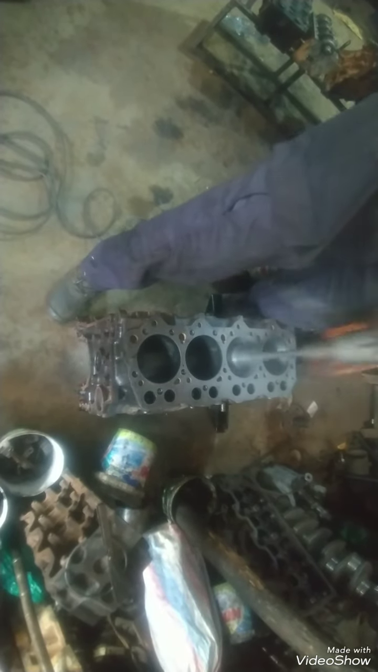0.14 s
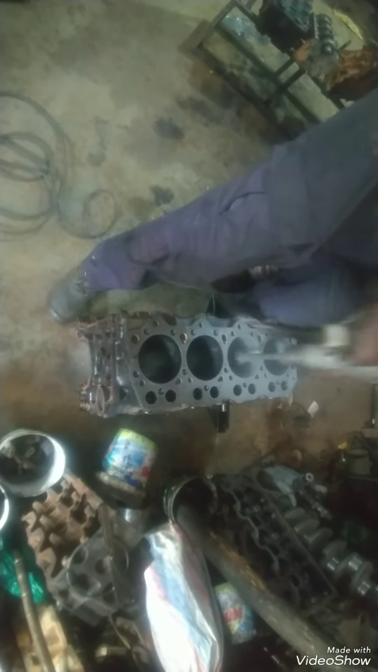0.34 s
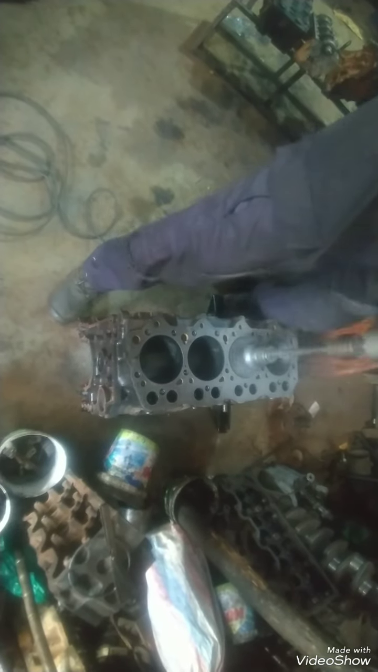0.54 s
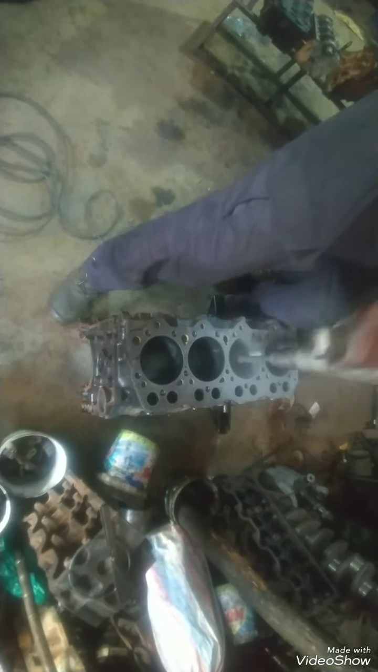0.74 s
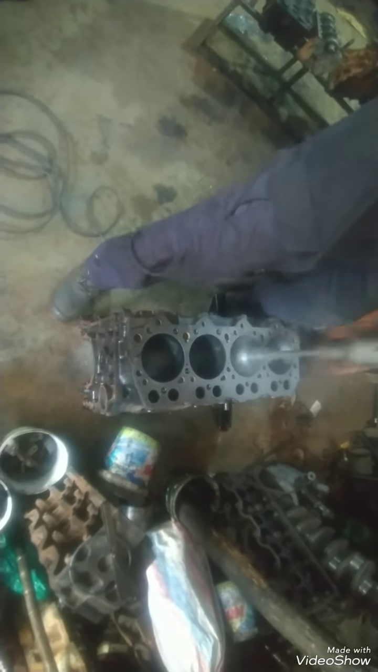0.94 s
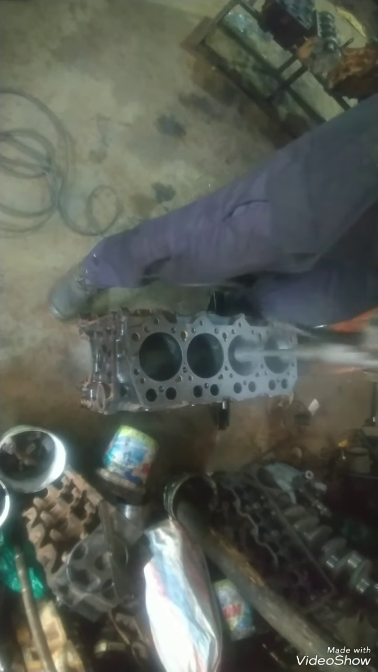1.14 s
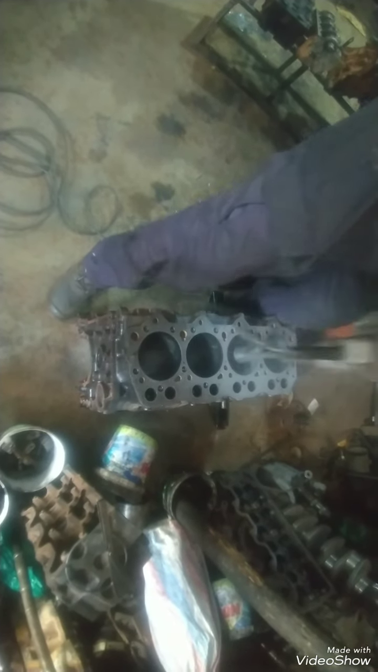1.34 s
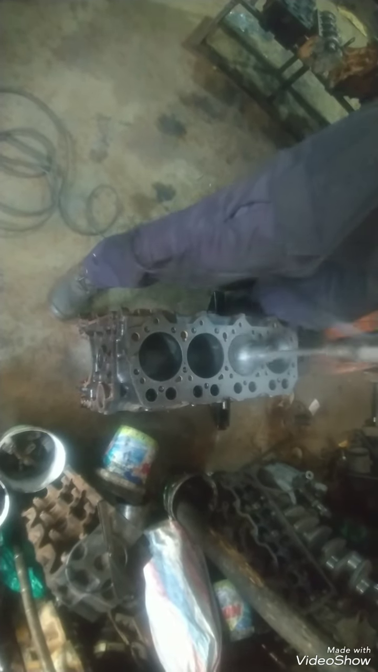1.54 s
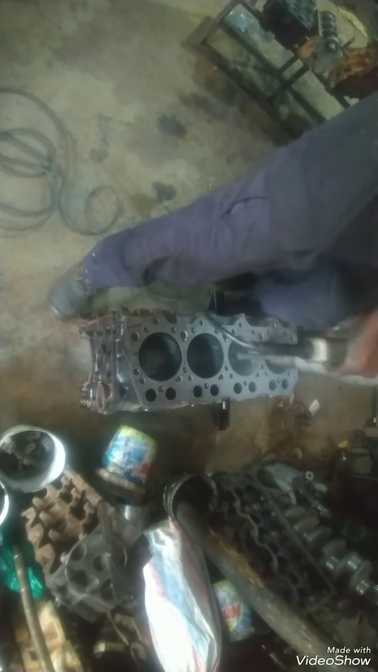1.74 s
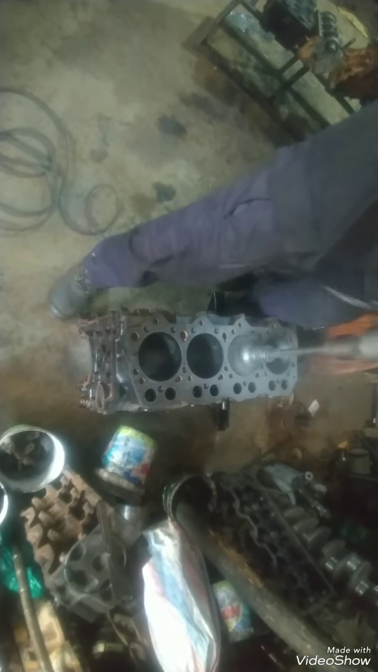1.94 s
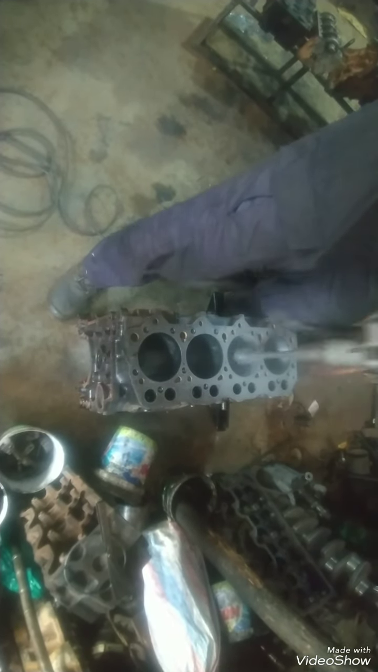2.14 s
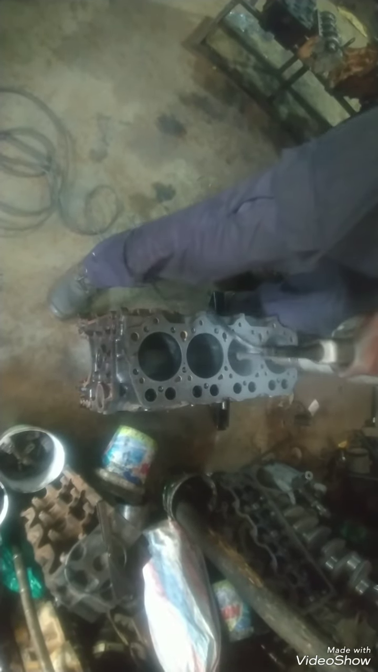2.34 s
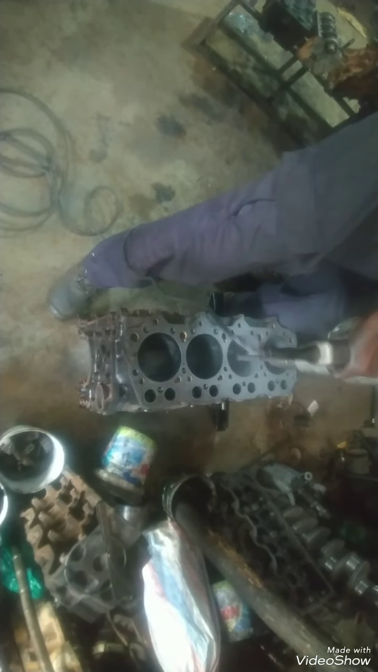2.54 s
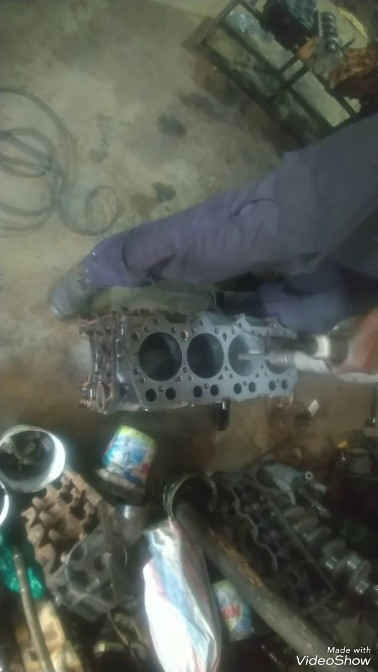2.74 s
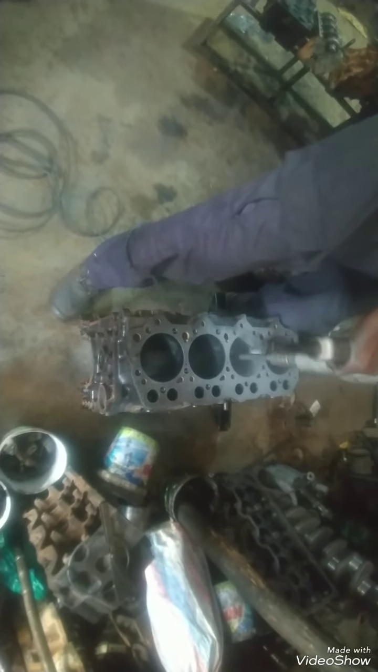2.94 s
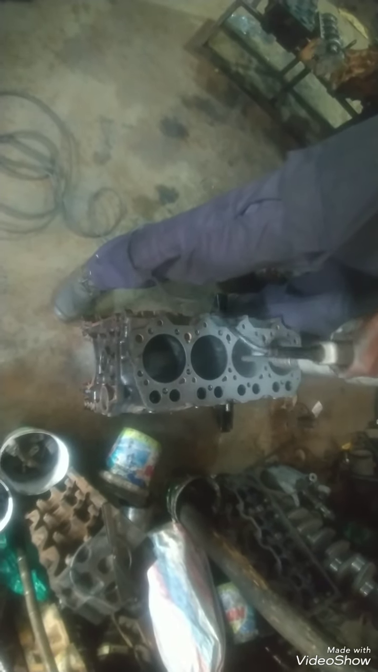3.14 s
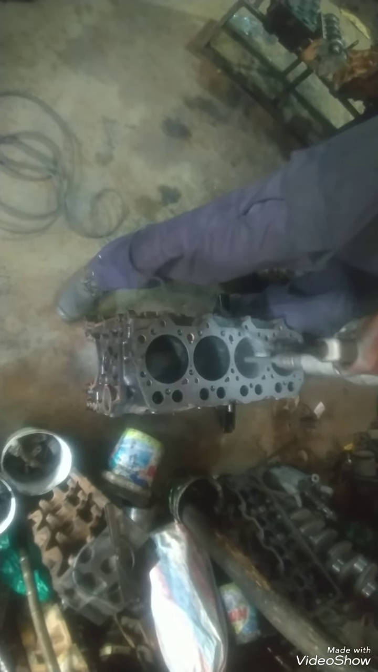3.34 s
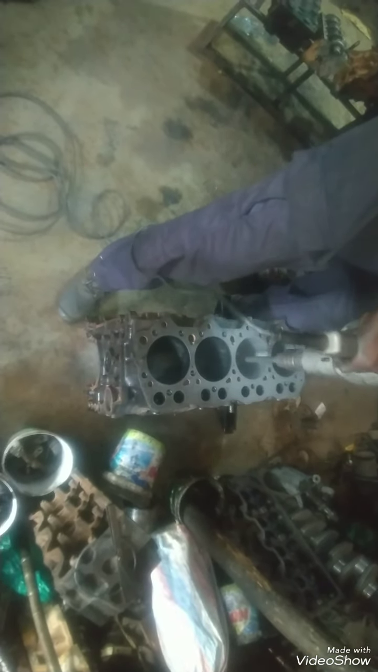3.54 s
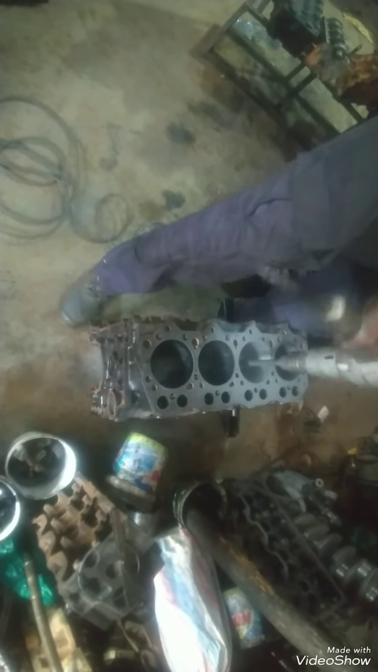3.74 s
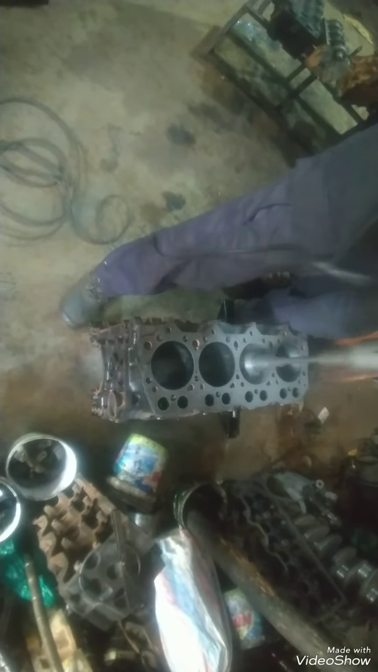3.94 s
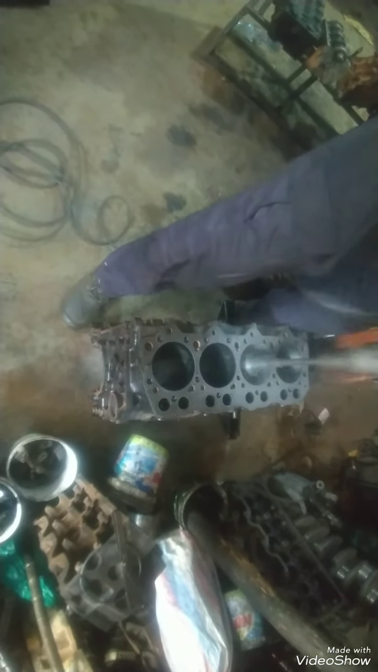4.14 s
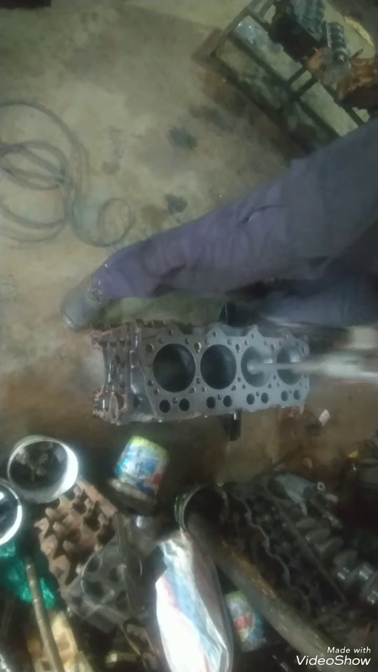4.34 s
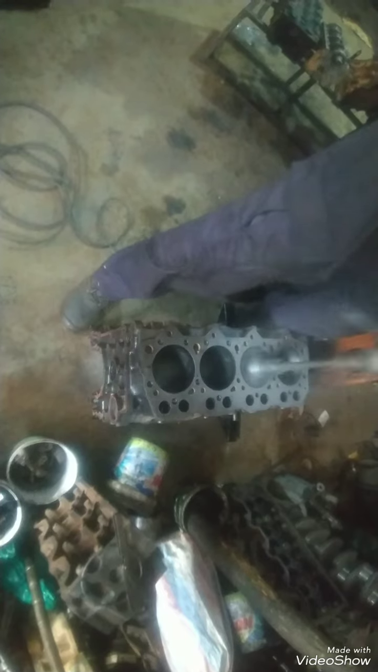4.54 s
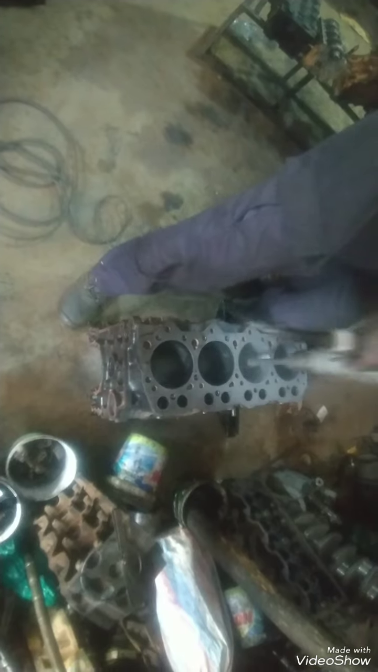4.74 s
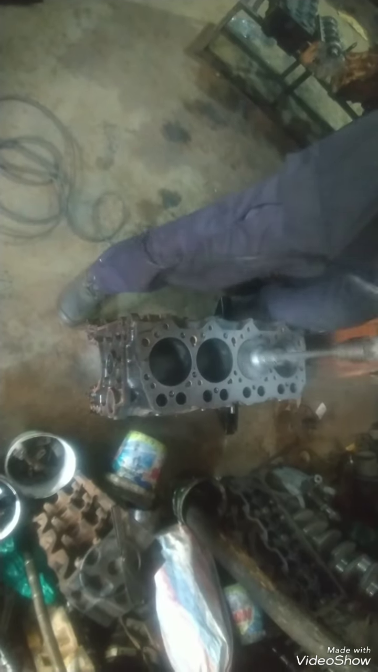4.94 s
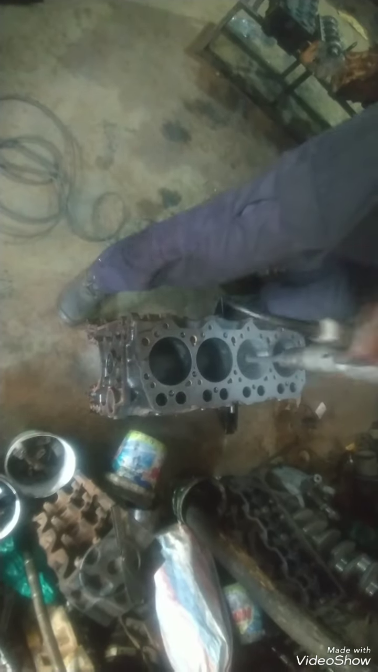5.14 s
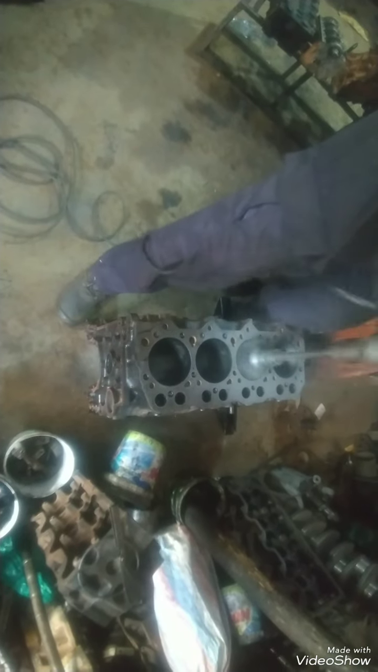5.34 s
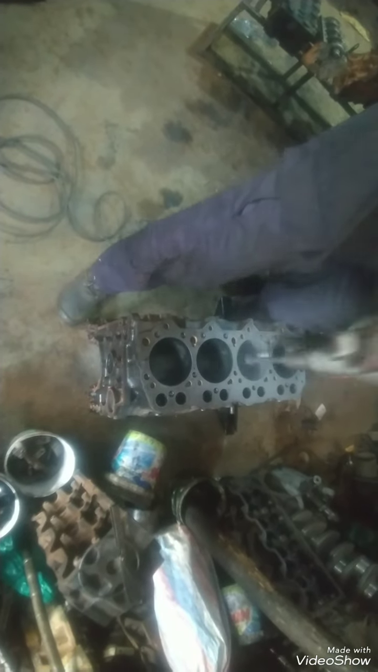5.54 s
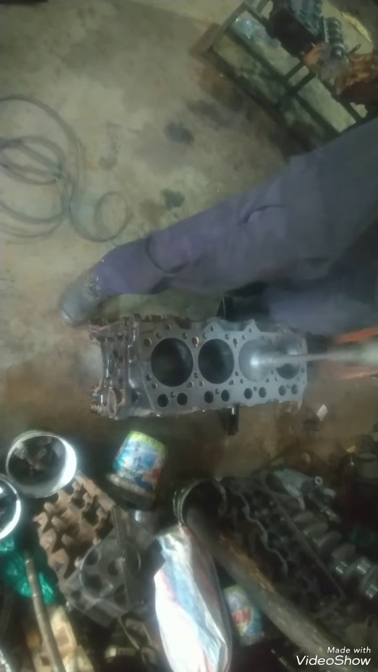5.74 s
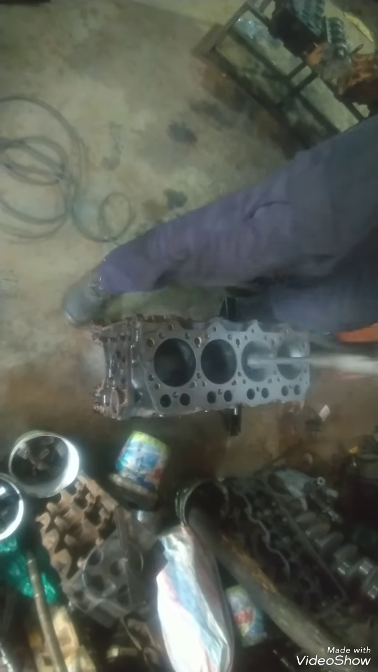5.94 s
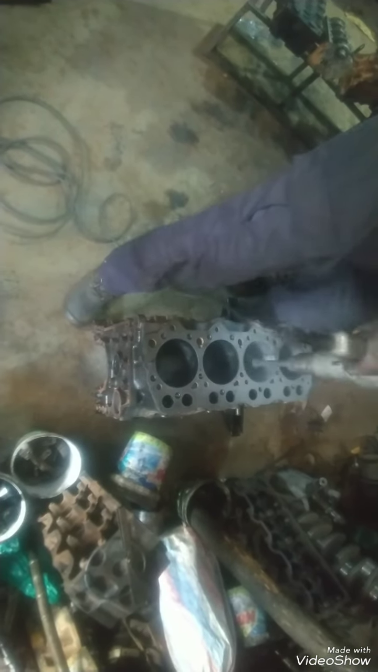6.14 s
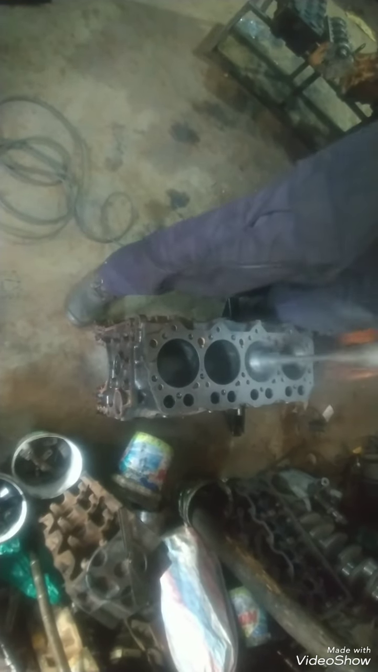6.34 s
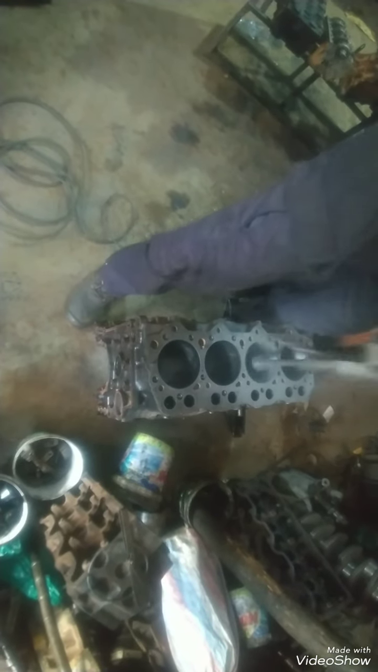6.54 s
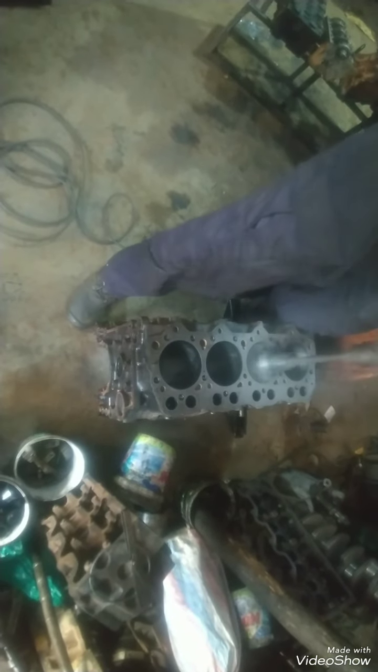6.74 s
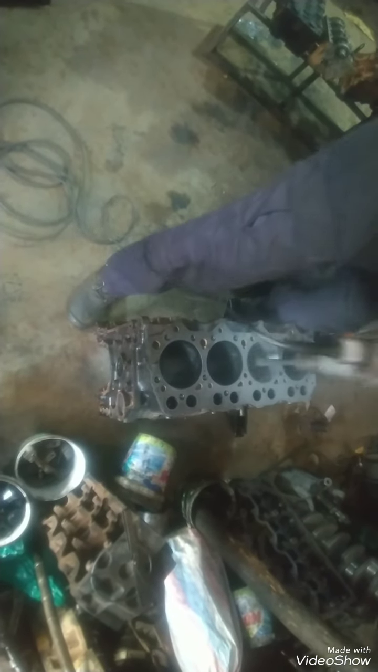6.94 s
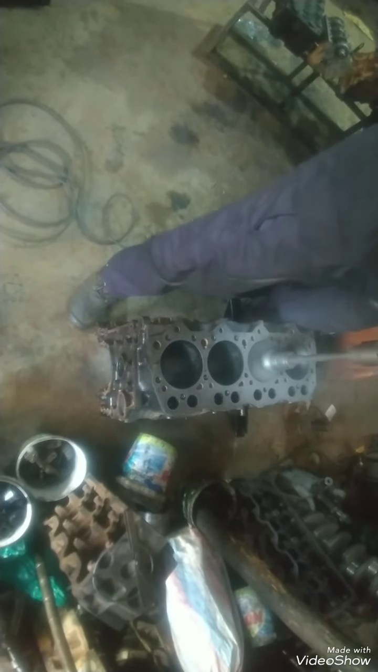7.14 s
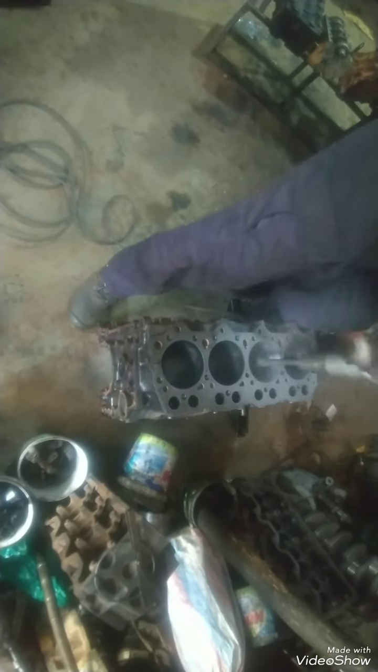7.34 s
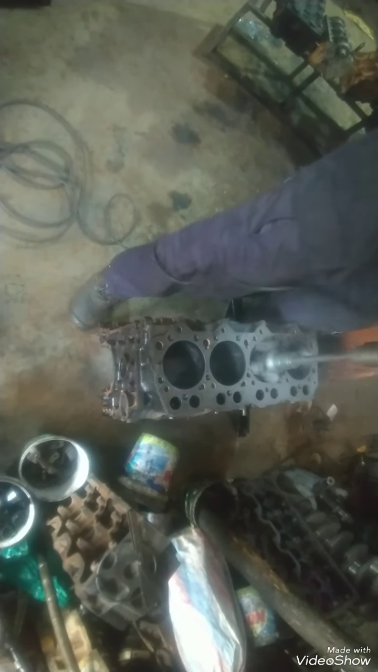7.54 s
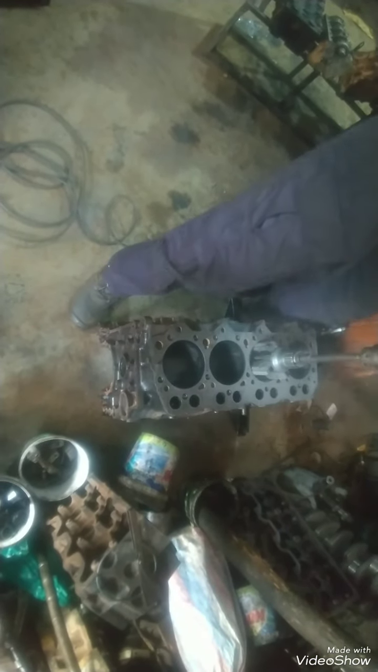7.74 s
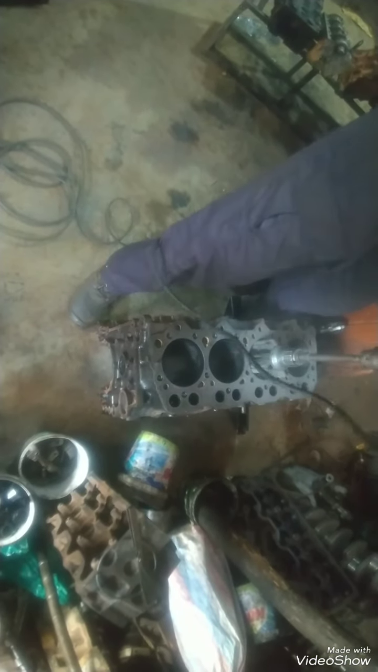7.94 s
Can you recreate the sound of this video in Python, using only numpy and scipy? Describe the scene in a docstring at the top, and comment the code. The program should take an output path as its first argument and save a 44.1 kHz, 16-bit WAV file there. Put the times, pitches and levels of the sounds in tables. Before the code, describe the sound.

From the start, an electric hand drill spins a hone inside an engine cylinder. Its high gear whine wavers slightly under load, over a rush of motor air and the steady grind of stones on metal. The strokes make faint hollow hoots roughly twice a second, and the hone's arms occasionally give a thin squeak. The pitch rises a little between about 2.5 and 3.5 seconds, then settles. At 5.3 seconds the motor dips briefly and spins back up. At 6.7 seconds it coasts down in a falling whine, with a short ringing swell near 7 seconds, stopping by about 7.4. From about 7.1 to 8 seconds the hone is dragged over the rim with quieter gritty scrapes, low knocks and small ringing metal clinks. A low workshop hum lies underneath throughout.

```python
"""A hand drill spins a spring hone up and down an engine bore, over the low hum of a workshop.
From the start, an 8-tooth pinion drives a 45-tooth chuck gear: gears and armature whine through the drill
body over fan rush and the grind of the stones. Strokes make the bore hoot; now and then a hone arm sings.
At 5.3 s the trigger slips briefly. At 6.7 s the drill coasts down, its whine swelling as it crosses the
body's resonance. From about 7.1 s the hone is dragged out over the rim, scraping, knocking and clinking."""
import sys
import numpy as np
from scipy import signal
from scipy.fft import rfft, irfft, next_fast_len
from scipy.io import wavfile
from scipy.ndimage import uniform_filter1d

SR = 44100
rng = np.random.default_rng(int(sys.argv[2]) if len(sys.argv) > 2 else 0)


def store_pcm(level_fs):
    """Save levels as 16-bit WAV."""
    pcm = np.round(np.clip(level_fs, -1, 1) * 32767).astype(np.int16)
    wavfile.write(sys.argv[1], SR, np.atleast_2d(pcm).T)


N = 357197
TIME = np.arange(N) / SR
PINION_TEETH, GEAR_TEETH = 8, 45
FULL_HZ, TOP_HZ = 1850, 14420  # tooth mesh at full speed; top of the spectrum


def undb(db):
    """Decibels to gain."""
    return 10 ** (np.asarray(db) / 20)


def unit(x):
    """Scale to rms 1."""
    return x / np.sqrt(np.mean(x ** 2))


def curves(table, at):
    """The later columns of a table, interpolated along its first."""
    knots, *columns = np.transpose(table)
    return [np.interp(at, knots, column) for column in columns]


def walk(rate):
    """Smooth random modulator, rms 1, with `rate` new values a second."""
    hold = max(int(SR / rate), 1)
    steps = np.repeat(rng.standard_normal(N // hold + 1), hold)
    return unit(uniform_filter1d(uniform_filter1d(steps, hold), hold)[:N])


def ring(x, modes):
    """Play x through parallel resonances, each (Hz, width Hz, dB)."""
    return sum(undb(db) * signal.lfilter(*signal.iirpeak(hz, hz / width, SR), x)
               for hz, width, db in modes)


def flicker(x, low_hz, depth_db, rate):
    """Third-octave bands from low_hz up each waver alone: by depth_db at 8 kHz, less below."""
    size = next_fast_len(N)
    log_hz, spectrum = np.log(np.arange(1, size // 2 + 2) * SR / size), rfft(x, size)
    step, out = np.log(2) / 3, 0
    for centre in np.arange(np.log(low_hz), np.log(TOP_HZ) + step, step):
        share = np.clip(1 - np.abs(log_hz - centre) / step, 0, 1)
        swing_db = depth_db * np.exp((centre - np.log(8000)) / 2)
        out = out + irfft(spectrum * share, size)[:N] * undb(swing_db * walk(rate))
    return out


def coloured_noise(colour, low_hz, flicker_db=0, rate=1):
    """Noise shaped by an EQ curve and cut below low_hz; steady unless given flicker."""
    hz, db = np.transpose(colour)
    size = next_fast_len(N)
    log_hz = np.log(np.arange(1, size // 2 + 2) * SR / size)
    gain = undb(np.interp(log_hz, np.log(hz), db))
    noise = irfft(rfft(rng.standard_normal(size)) * gain, size)[:N]
    return unit(flicker(noise, low_hz, flicker_db, rate))


def swells(times, peaks_db, half_lengths, floor_db):
    """Gain envelope of rounded swells over a floor."""
    return undb(floor_db) + sum(undb(db) / np.cosh((TIME - s) / half_s) ** 2
                                for s, db, half_s in zip(times, peaks_db, half_lengths))


# Speed with the trigger held; early strokes load it down. Each row: time in seconds, tooth mesh in Hz.
HELD_SPEED = [(0, 1792), (.22, 1827), (.5, 1780), (.75, 1826), (1.0, 1770), (1.25, 1809), (1.5, 1758),
              (1.76, 1801), (2.05, 1747), (2.3, 1791), (2.55, 1885), (3.0, 1956), (3.4, 2000), (3.95, 1865),
              (4.6, 1866), (5.3, 1859), (6.3, 1870), (6.7, 1871)]
# Trigger releases. Each row: start in seconds, length in seconds.
RELEASES = [(5.3, .215), (6.7, 2)]
# The coast. Each row: seconds since release, share of speed left.
COAST = [(0, 1), (.14, .815), (.3, .53), (.4, .375), (.5, .26), (.63, .11), (.73, 0)]
def drill_speed(recover_s=.185):
    """Tooth mesh in Hz: the drill runs down when the trigger is let go and spins up when it is pulled."""
    hz = uniform_filter1d(curves(HELD_SPEED, TIME)[0], size=5000)
    for start, length in RELEASES:
        lost = 1 - curves(COAST, np.clip(TIME - start, 0, length))[0]
        hz = hz * (1 - lost * np.exp(-np.clip(TIME - start - length, 0, None) / recover_s))
    return np.maximum(uniform_filter1d(hz, size=600), 1)


# Resonances of the drill body. Each row: pitch in Hz, width in Hz, gain in dB.
HOUSING_MODES = [(3508, 250, 12.5), (2740, 71, -63), (5200, 530, -59), (7840, 2100, 0.5), (13030, 1280, 13)]
def through_housing(x, ring_db):
    """A sound plus the housing's ring: tones swell as they cross a resonance."""
    return x + undb(ring_db) * ring(x, HOUSING_MODES)


# Fader ride of the mesh tone, before slowing dims it. Each row: time in seconds, level in dB.
MESH_RIDE = [(0, -17), (.35, -18.5), (.8, -21.5), (1.4, -17.5), (2.0, -17.5), (2.3, -21.5), (2.6, -14.5),
             (2.85, -20), (3.05, -15.5), (3.6, -15), (3.9, -16.5), (4.3, -17), (4.75, -19), (5.3, -17.5),
             (5.55, -17.5), (6.1, -17), (6.4, -24), (6.65, -15.5), (6.82, -15.5), (7.0, -22), (7.2, -16.5)]
# How well the housing radiates mesh harmonics 2 and 3. Each row: frequency in Hz, gain in dB.
RADIATION = [(100, -62), (1000, -32), (1800, -18), (2500, -12), (2840, -11), (3080, -16), (3350, -2.5),
             (3550, -1), (3740, -7.5), (3900, -15), (4250, -10), (4700, -14), (5500, -15), (6000, -14)]
def whine_levels(mesh_hz):
    """Wavering levels in dB: mesh and chuck tones sink as the drill slows; harmonics follow the housing."""
    octaves = np.log2(np.clip(mesh_hz / FULL_HZ, 0, 1))
    mesh_db = curves(MESH_RIDE, TIME)[0] + 11 * octaves + 1.5 * walk(9)
    chuck_db = -22 + 17 * octaves + 1.5 * walk(9)
    octave_db = -10.5 + curves(RADIATION, 2 * mesh_hz)[0] + 1.5 * walk(12)
    third_db = -19 + curves(RADIATION, 3 * mesh_hz)[0] + 1.5 * walk(12)
    return mesh_db, chuck_db, octave_db, third_db


# Motor partials. Each row: multiple of the armature's turn, level in dB against the mesh tone,
# gain in dB per octave above full speed.
ARMATURE_PARTIALS = [(0.995, -21, -12), (11.07, -15.5, 62), (14.22, -12.5, -16), (32.8, -19, -68),
                     (35.5, -42, 0), (46.3, -46, 0)]
# Chuck partials. Each row: multiple of the chuck's turn, level in dB against its 20th multiple.
CHUCK_PARTIALS = [(30, -12.5), (35, -32), (55, -17), (65, -12), (70, -10), (100, -10)]
def whine(mesh_hz, chuck_angle):
    """Gear and armature tones; the chuck gear runs out of true, so each turn rocks the mesh."""
    mesh_db, chuck_db, octave_db, third_db = whine_levels(mesh_hz)
    rock = 0.008 * np.sin(chuck_angle) + 0.0023 * walk(150) + 0.018 * walk(25)  # radians of chuck turn
    armature_angle = (chuck_angle + rock) * GEAR_TEETH / PINION_TEETH
    tooth_phase = PINION_TEETH * armature_angle
    mesh = np.sin(tooth_phase) * (1 + 0.13 * walk(35) + 0.32 * walk(90))  # teeth lose and regain contact
    slack = np.clip(np.log2(0.93 * FULL_HZ / mesh_hz), 0, 1)  # slow gears rattle loosely
    octave = np.sin(2 * tooth_phase + 2.2 * slack * walk(300))
    # uneven teeth give the octave a noisy skirt
    octave *= 1 + 0.38 * walk(250) + 0.24 * walk(60) + 0.18 * np.sin(chuck_angle + 2.52 * walk(6))
    third = np.sin(3 * tooth_phase + 1.2 * walk(260)) * (1 + 1.2 * walk(200))
    overspeed = np.log2(np.clip(mesh_hz / FULL_HZ, 1, 2))
    motor = sum(undb(db + slope * overspeed + 1.6 * walk(13))
                * np.sin(k * (armature_angle + 0.0064 * walk(120)))
                for k, db, slope in ARMATURE_PARTIALS)
    chuck = np.sin(20 * chuck_angle + 0.55 * walk(60)) * undb(1.4 * walk(24.87))
    chuck += sum(undb(db + 2.5 * walk(12)) * np.sin(k * (chuck_angle + rock)) for k, db in CHUCK_PARTIALS)
    motor_db = uniform_filter1d(mesh_db, size=12000)
    partials = undb(motor_db) * motor + undb(chuck_db) * chuck + undb(third_db) * third
    housed = through_housing(partials, ring_db=1)
    return np.sqrt(2) * (undb(mesh_db) * mesh + undb(octave_db) * octave + housed)


# EQ of the fan and grind. Each row: frequency in Hz, relative level in dB.
RUSH_COLOUR = [(150, -11.5), (350, -10), (600, 2), (1000, 0), (1500, -0.5), (2400, -1), (4500, -3),
               (6500, -11.5), (8200, -16.5), (9500, -24.5), (12000, -23), (14500, -39)]
def fan_and_grind(chuck_angle, rush_db, treble_db):
    """Fan air and stone grind throb once a chuck turn and ring the housing; squeaks ride on top."""
    air = coloured_noise(RUSH_COLOUR, low_hz=115, flicker_db=2.86, rate=18)
    air *= (1 + .12 * np.sin(chuck_angle)) * undb(.4 * walk(6) + 1.9 * walk(300))
    air = through_housing(air, ring_db=-1.17)
    low, high = (unit(signal.sosfilt(signal.butter(4, 6000, kind, fs=SR, output="sos"), air))
                 for kind in ("low", "high"))
    grind = low + undb(-9.5) * squeaks(swing_db=5, rate=14)
    return undb(rush_db - 2.5) * grind + undb(treble_db + 2.5) * high


# Resonances of the hone arms. Each row: pitch in Hz, width in Hz, relative level in dB.
ARM_MODES = [(1610, 30, 4), (2640, 39, -19), (3114, 11.3, 15.5), (3570, 540, 3), (4183, 42, 16.5),
             (4900, 87, 13.5), (5140, 85, 10), (5280, 200, 0), (6040, 33, 11.5), (6980, 58, 13.5),
             (7560, 78, 9), (7660, 160, 10.5), (8450, 78, 13), (12230, 33, 2.5), (11800, 51, -28)]
def squeaks(swing_db, rate):
    """The hone arms all ring at once under the grinding stones, each wavering in level on its own."""
    return unit(sum(ring(rng.standard_normal(N), [mode]) * undb(swing_db * walk(rate))
                    for mode in ARM_MODES))


def rumble(level_db):
    """A low, slowly wavering drone under the running drill."""
    drone = unit(ring(rng.standard_normal(N), [(65, 22, -3), (94.9, 9.1, 9), (260, 79, 1.5)]))
    return drone * undb(level_db + 0.5 * walk(2.4))


# EQ of the room tone. Each row: frequency in Hz, relative level in dB.
SHOP_COLOUR = [(15, -65), (25, -21), (49, -6.5), (69, -2), (92, -8.5), (165, -14.5), (259, -21), (376, -19),
               (575, -31.5), (2900, -40), (4210, -40), (14300, -81)]
def shop_hum():
    """The workshop's steady, bass-heavy bed of noise."""
    return coloured_noise(SHOP_COLOUR, low_hz=20) * undb(-35.5)


# Resonances of the air in the bore. Each row: pitch in Hz, width in Hz, relative level in dB.
BORE_MODES = [(678.6, 32, 1), (488, 35, -11)]
# Hoots. Each row: peak time in seconds, relative level in dB, half length in seconds.
STROKE_HOOTS = [(0.175, -18, 0.12), (0.616, -22.5, 0.12), (1.108, -18.5, 0.11), (1.283, -23, 0.068),
                (1.66, -19, 0.11), (2.645, -25, 0.084), (3.175, -34, 0.061), (3.67, -21, 0.1),
                (4.13, -16.5, 0.089), (4.263, -20, .04), (4.62, -15, 0.093), (5.0, -16.5, 0.079),
                (5.42, -22, 0.071), (5.732, -31, 0.037), (5.9, -20, 0.048), (6.04, -20, 0.044),
                (6.336, -22, 0.073), (6.478, -22, 0.034), (6.746, -16, 0.061), (7.129, -32, .05)]
def bore_hoots(rush_db):
    """Each stroke makes the air in the bore hoot, over a floor that follows the fan and grind."""
    hollow = unit(ring(rng.standard_normal(N), BORE_MODES))
    envelope = swells(*np.transpose(STROKE_HOOTS), floor_db=-29 + rush_db - rush_db.max())
    return undb(-3.5) * envelope * hollow


# Brief ringing swells, mostly hone arms; the one at 6.952 s is the slowing gear whine crossing the drill
# body's resonance. Each row: peak time in seconds, rough pitch in Hz, level in dB, half length in seconds.
RING_SWELLS = [(.4, 5030, -25, .04), (.9, 5030, -27, .04), (2.7, 7690, -21, 0.13), (3.2, 7690, -24, 0.38),
               (3.2, 6020, -24, .2), (5.47, 5030, -17, .04), (6.88, 4210, -17, .03),
               (6.931, 6020, -19, .02), (6.952, 3580, -14, 0.046), (7.17, 5260, -29, 0.059),
               (7.24, 4900, -33, .04), (7.22, 2660, -31.5, 0.075), (7.3, 1580, -39, 0.042)]
def ringing_swells():
    """A narrow band of noise swells and fades at the listed resonance nearest each pitch."""
    out = 0
    for s, near_hz, db, half_s in RING_SWELLS:
        hz, width, _ = min(ARM_MODES, key=lambda mode: abs(mode[0] - near_hz))
        band = unit(ring(rng.standard_normal(N), [(hz, width / 2, 0)]))
        out = out + undb(db) * band / np.cosh((TIME - s) / half_s) ** 2
    return out


# EQ of the scrape. Each row: frequency in Hz, relative level in dB.
SCRAPE_COLOUR = [(410, -39), (700, 1), (784, -4), (2160, -3.5), (7360, -7), (9480, -18), (11200, -17),
                 (14400, -23)]
# The hone catches on the rim. Each row: peak time in seconds, scrape level in dB, knock level in dB,
# half length in seconds.
RIM_CATCHES = [(7.148, -50, -27, .025), (7.207, -50, -32, .015), (7.724, -48, -42, 0.044),
               (7.771, -35, -39, 0.018), (7.839, -35, -30, 0.026), (7.87, -50, -30, 0.0099),
               (7.91, -29, -41, 0.023), (7.968, -39.5, -50, 0.022), (8.06, -54, -48, 0.074)]
def rim_drag(floor_db=-59):
    """Stones slip over the rim with grit and squeaks, the block knocks low; faint rubbing lies under it."""
    times, scrape_db, knock_db, half_s = np.transpose(RIM_CATCHES)
    grit = coloured_noise(SCRAPE_COLOUR, low_hz=352)
    grit = unit(grit + undb(-1.5) * squeaks(swing_db=2, rate=9.6))
    knock = unit(ring(rng.standard_normal(N), [(314, 28, 0), (400, 110, -18.5), (473, 480, -5)]))
    return (grit * swells(times, scrape_db, half_s, floor_db)
            + knock * swells(times, knock_db, half_s, floor_db))


# Arm strikes. Each row: start in seconds, tick level in dB, rough pitch in Hz, ring level in dB.
ARM_STRIKES = [(7.419, -40, 4150, -45), (7.615, -49, 3080, -45), (7.762, -41, 4720, -49),
               (7.822, -40, 3500, -44), (7.887, -42, 3080, -30), (7.912, -42, 7450, -30)]
def clinks(tick_decay_s=0.0033, ring_decay_s=0.025):
    """A short tick sets one hone arm ringing in a close, beating pair of tones."""
    out, t = np.zeros(N), TIME[:8000]
    for start, tick_db, near_hz, ring_db in ARM_STRIKES:
        hz, _, _ = min(ARM_MODES, key=lambda mode: abs(mode[0] - near_hz))
        tick = undb(tick_db) * rng.standard_normal(len(t)) * np.exp(-t / tick_decay_s)
        pair = np.sin(2 * np.pi * hz * t) + 0.5 * np.sin(2 * np.pi * (hz + 70) * t)
        i = int(start * SR)
        out[i:i + len(t)] += tick + undb(ring_db) * pair * np.exp(-t / ring_decay_s)
    return out


# Noise mix by drill speed. Each row: tooth mesh in Hz, then relative levels in dB of the fan and grind,
# its treble, and the rumble.
NOISE_MIX = [(15, -60, -70, -55), (109.5, -46, -62, -41), (255, -29, -47, -43), (428, -22, -33, -35),
             (830, -19, -23, -42), (1000, -16, -23, -31), (1260, -11, -19.5, -41), (1760, -10, -20, -34),
             (2000, -8, -21, -31.5)]
def scene():
    """Drill, hone and shop hum, all dead centre."""
    mesh_hz = drill_speed()
    chuck_angle = 2 * np.pi * np.cumsum(mesh_hz) / SR / GEAR_TEETH
    rush_db, treble_db, rumble_db = curves(NOISE_MIX, mesh_hz)
    drill = whine(mesh_hz, chuck_angle) + rumble(rumble_db)
    drill += fan_and_grind(chuck_angle, rush_db, treble_db) + bore_hoots(rush_db)
    turning = np.clip(mesh_hz / 15, 0, 1) ** 2  # fades the drill out as it stops
    mid = turning * drill + shop_hum() + ringing_swells() + rim_drag() + clinks()
    return np.array([mid, mid])


def record(dry):
    """The phone rounds the loudest peaks and cuts the top; only the treble spreads wide, in patches."""
    mid = .7 * np.tanh(dry[0] / .7)
    # the same treble, smeared in time, forms the side signal
    smear = rng.standard_normal(4000) * np.exp(-np.arange(4000) / 1500)
    side = signal.fftconvolve(mid, smear / np.sqrt(np.sum(smear ** 2)))[:N]
    side = signal.sosfilt(signal.butter(5, 7600, "high", fs=SR, output="sos"), side)
    side = flicker(side, low_hz=4000, depth_db=4.5, rate=12) * undb(-2.5)
    top_cut = signal.ellip(12, .2, 80, TOP_HZ, fs=SR, output="sos")
    return signal.sosfilt(top_cut, np.array([mid + side, mid - side]))


dry = scene()
out = record(dry)
store_pcm(out)
```